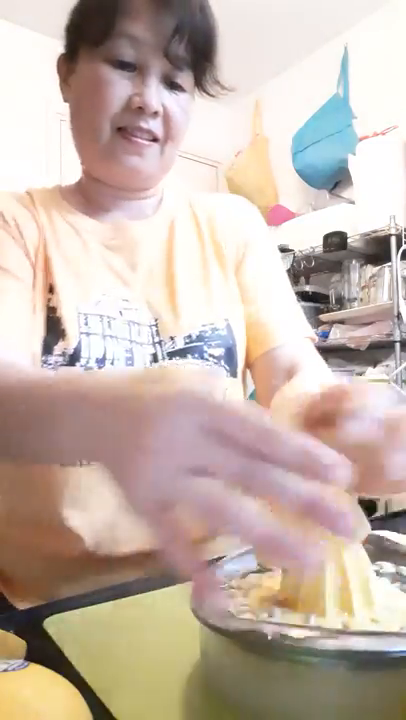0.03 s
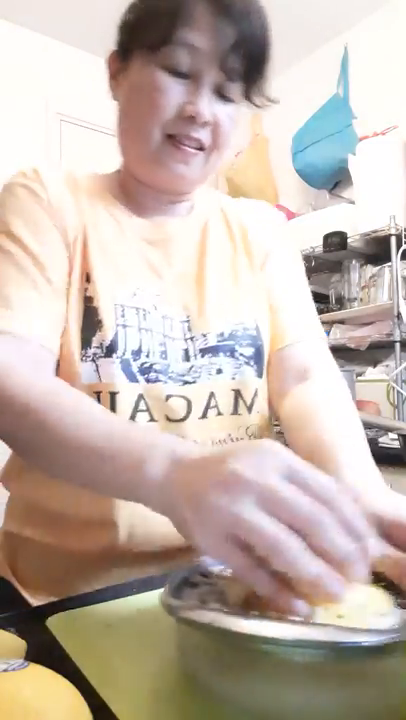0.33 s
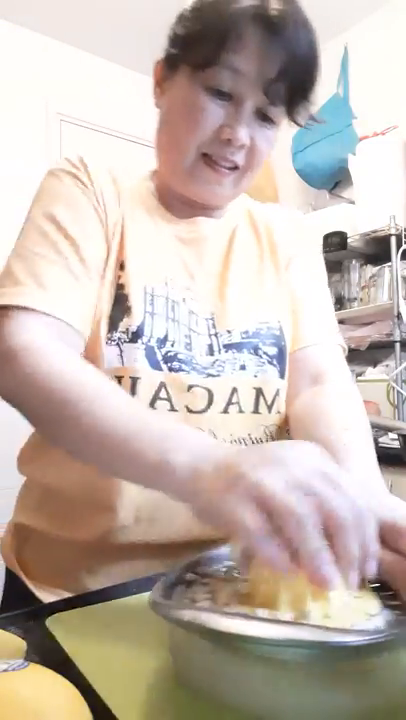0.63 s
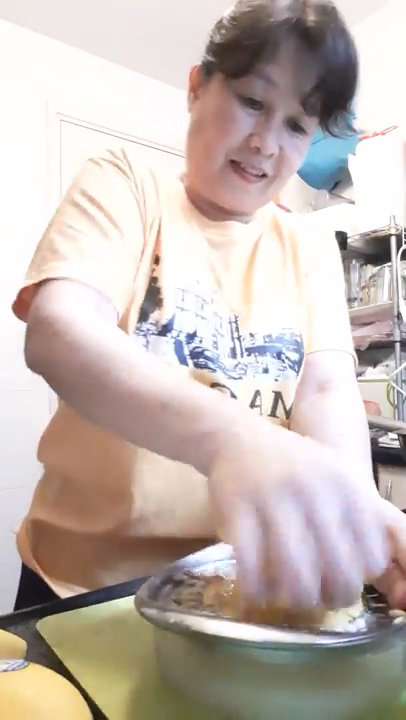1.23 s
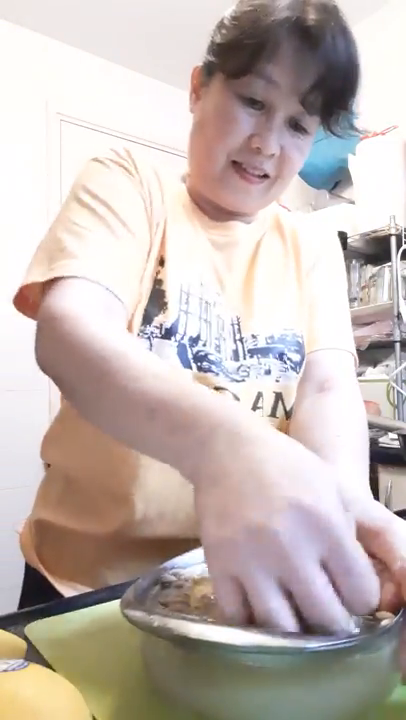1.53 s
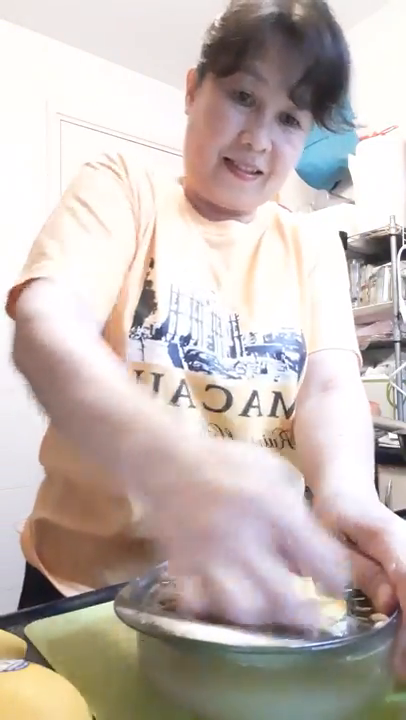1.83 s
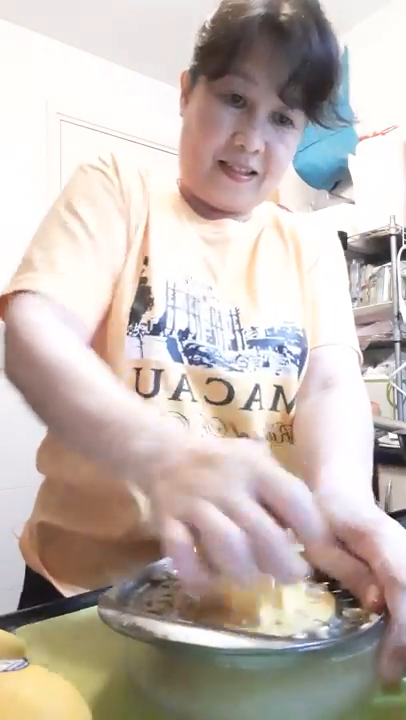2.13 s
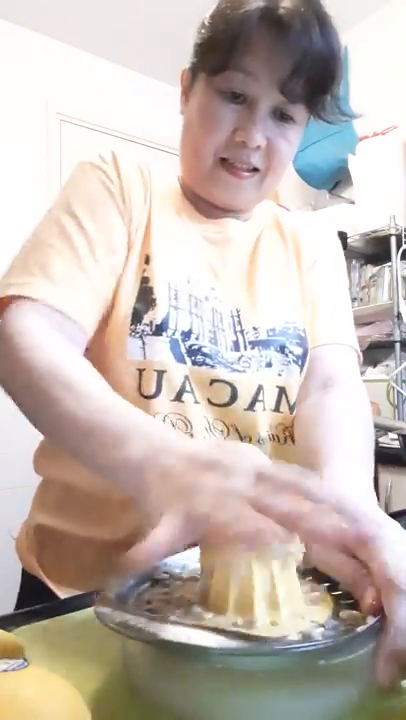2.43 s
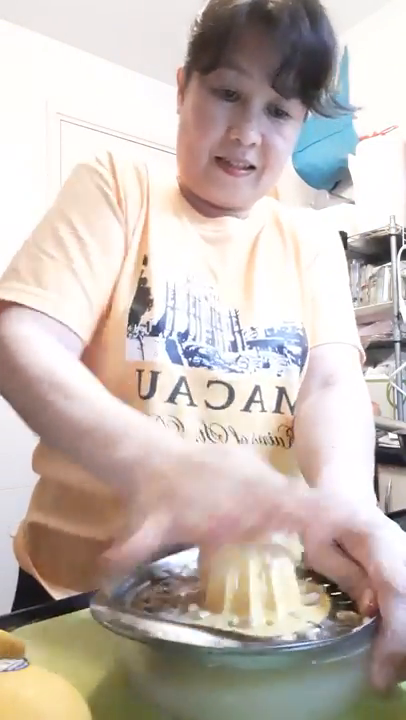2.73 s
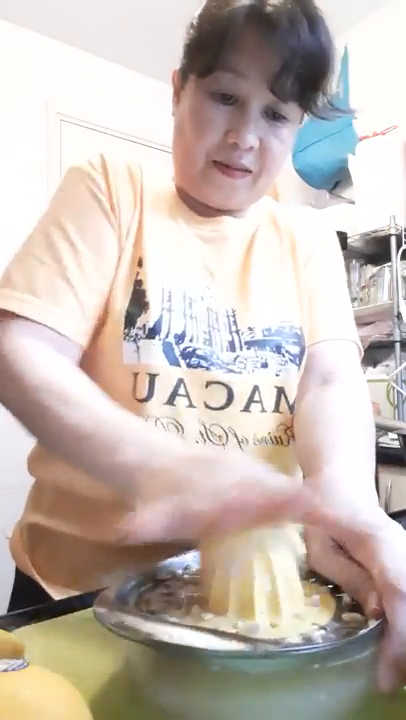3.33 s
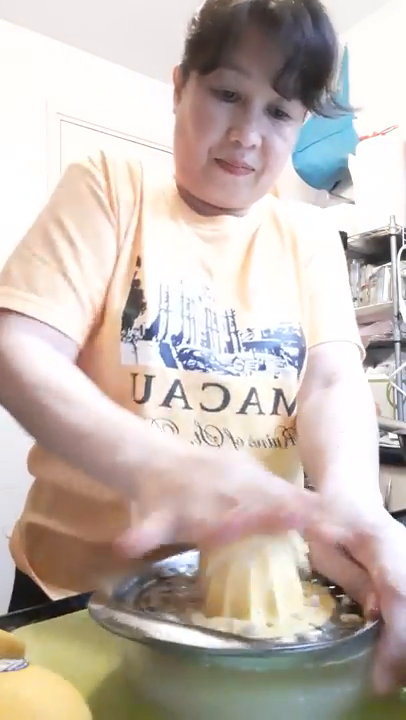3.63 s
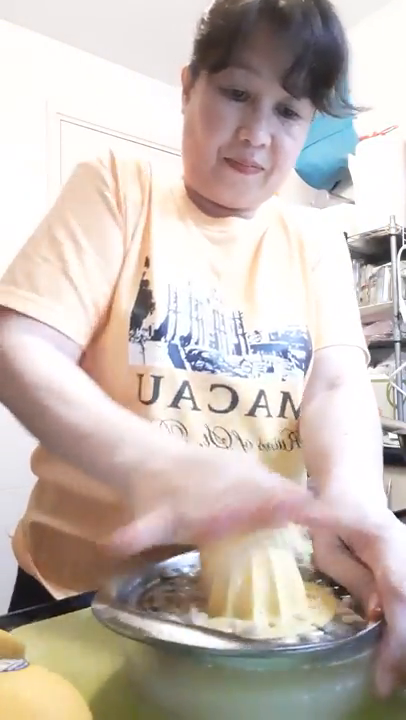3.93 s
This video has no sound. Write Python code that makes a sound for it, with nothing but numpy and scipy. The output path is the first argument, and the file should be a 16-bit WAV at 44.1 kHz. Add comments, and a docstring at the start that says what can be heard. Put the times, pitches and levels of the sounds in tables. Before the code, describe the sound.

A metal juicer knocks and chatters hollowly on a glass bowl as a lemon is twisted on it, starting lightly at 0.2 seconds and continuing unevenly until 4. Brief hollow hoots come near 0.5, 0.8 and 2.3 seconds. Pulp crackles and juice squirts, more strongly after 2.5, with short rasps and sharp ticks. Pushes thump the worktop between 0.8 and 2.8 seconds. Everything is close, over quiet kitchen air.

```python
"""A ridged metal juicer knocks and chatters on a glass bowl as a lemon half is pressed and twisted on it.
Each blow rings the plate, the bowl and the hollow between them, which hoots when the juicer rocks free.
Pulp crackles, juice spits out in squirts, rubbing adds a few short rasps and single cells tick sharply.
The hardest pushes thump the worktop. It is all heard close up in a kitchen, over quiet room air."""
import sys
import numpy as np
from scipy import signal
from scipy.fft import rfft, irfft, next_fast_len
from scipy.io import wavfile
from scipy.ndimage import map_coordinates

SR = 44100
rng = np.random.default_rng(int(sys.argv[2]) if len(sys.argv) > 2 else 0)


def persist_wave(psi):
    """Save psi, clipped to +-1, as 16-bit WAV."""
    counts = np.round(np.clip(psi, -1, 1) * 32767).astype(np.int16)
    wavfile.write(sys.argv[1], SR, np.atleast_2d(counts).T)


N = 176400

# The twisting hand. Each row: time in seconds, chatter level in dB, wet crackle level in dB.
HAND_EFFORT = [(.17, -46.5, -67), (.36, -34, -42), (.79, -24.5, -44), (0.901, -46, -61), (0.958, -27, -43),
               (1.28, -31, -59), (1.429, -24, -40.5), (1.60, -37.5, -58), (1.688, -28.5, -41),
               (2.32, -29, -47), (2.50, -28, -29.5), (2.63, -28.5, -47), (2.99, -26, -37.5),
               (3.14, -32.5, -47.5), (3.198, -27.5, -31.5), (3.45, -30.5, -45.5), (3.59, -28.5, -32.5),
               (4.0, -26.5, -48)]
# Juicer on bowl. Each row: start in seconds, level in dB, hollow's pitch in Hz, relative clack in dB.
RIM_KNOCKS = [(0.204, -28.5, 606, -4), (0.624, -16, 562, -12), (0.745, -17, 596, -18),
              (0.923, -21, 537, -18.5), (0.941, -29, 555, -3), (0.982, -16, 563, -13),
              (1.047, -11, 585, -26), (1.058, -13.5, 695, -20), (1.075, -14.5, 543, -25),
              (1.092, -14.5, 715, -22), (1.165, -15, 542, -13.5), (1.18, -15.5, 539, -18.5),
              (1.247, -21, 555, -20), (1.337, -16, 570, -5.5), (1.368, -15, 524, -16),
              (1.619, -17.5, 527.5, -20.5), (1.756, -13.5, 571, -19), (1.815, -21, 597, -14),
              (1.836, -20.5, 540, -22), (2.019, -8, 525, -17), (2.162, -19.5, 543, -12),
              (2.236, -20.5, 533, -4), (2.343, -11, 543, -19), (2.481, -14, 579, -13),
              (2.621, -17.5, 545, -19), (2.639, -19, 557, -36), (2.73, -18, 521, -13),
              (2.767, -15.5, 583, -15.5), (2.781, -12, 524, -39), (2.912, -16, 540, -9),
              (3.016, -15, 555, -12.5), (3.237, -27.5, 570, -2.5), (3.313, -14.5, 517, -10),
              (3.434, -23, 595, -25), (3.565, -18, 541, -18)]
# Ring of the covered bowl. Each row: pitch in Hz, seconds to fade by 60 dB, level in dB.
BOWL_MODES = [(150, 0.071, -19), (288.4, 0.13, -23.5), (351.7, 0.08, -8.5), (521.5, 0.27, -15),
              (574, 0.06, -13), (734, 0.12, -17), (868, 0.14, -24.5)]
# Clack of the metal plate. Each row: pitch in Hz, seconds to fade by 60 dB, level in dB.
PLATE_MODES = [(945, 0.048, -2), (1487, 0.02, 9), (1608, 0.035, 5.5), (2706, 0.014, 0)]
# Spits of juice and short midrange rubbing rasps (the three rows with the body above 20 dB).
# Each row: start in seconds, swell in seconds, level in dB, relative body in dB, body pitch in Hz.
SQUIRTS_AND_RASPS = [(0.229, 0.0011, -35.5, 7, 1600), (0.434, 0.03, -49, 27.5, 1335),
                     (0.607, 0.016, -31.5, 11, 2940), (0.928, 0.0038, -34.5, 4, 1510),
                     (0.984, 0.013, -32, 2, 3970), (1.162, 0.021, -50, 24, 1600),
                     (1.310, 0.04, -25.5, -1.5, 1710), (1.723, 0.019, -33, 0.5, 1600),
                     (2.231, 0.0033, -30.5, 3, 1880), (2.247, 0.02, -47.5, 27.5, 1400),
                     (2.384, 0.0039, -27.5, 3.5, 4900), (2.534, 0.023, -27.5, 2, 1580),
                     (2.839, 0.012, -37.5, 2, 1800), (2.873, 0.023, -28, 2.5, 1800),
                     (3.027, 0.018, -20.5, -3, 1560), (3.165, 0.01, -29.5, -6, 1700),
                     (3.317, 0.032, -25.5, 4, 1430), (3.533, 0.036, -31, 2, 1670),
                     (3.628, 0.016, -20, -2, 1660), (3.792, 0.03, -23.5, 7, 1760),
                     (3.931, 0.0056, -28, 3.5, 1350)]
# Fleshy midrange of pulp. Each row: frequency in Hz, level in dB.
PULP_EQ = [(300, -10), (700, 7.5), (1150, -6), (1600, -1.5), (2800, -5), (14000, -31)]
# Bright fizz of spray. Each row: frequency in Hz, level in dB.
SPRAY_EQ = [(1500, -41), (4700, -8), (6500, -11), (9300, -3.5), (16000, -8.5)]
# Single cells bursting. Each row: start in seconds, level in dB.
CELL_TICKS = [(0.412, -28), (0.506, -31), (0.778, -24), (0.883, -39.5), (1.094, -33), (1.482, -36),
              (1.869, -17.5), (1.883, -36), (1.985, -30), (2.039, -29.5), (2.249, -27.5), (2.412, -21),
              (2.69, -27), (2.854, -32.5), (3.173, -17), (3.488, -26), (3.789, -11)]
# The hollow singing on. Each row: start in seconds, level in dB, pitch in Hz, decay in seconds.
HOLLOW_HOOTS = [(.469, -7, 513.3, 0.024), (.809, -8, 529, 0.014), (2.262, -11, 507.5, 0.059)]
# Hard pushes into the worktop. Each row: start in seconds, level in dB.
WORKTOP_THUMPS = [(0.777, -20.5), (1.158, -24), (1.371, -22), (1.813, -18.5), (2.47, -13), (2.769, -18)]
# Low rumble of the worktop. Each row: frequency in Hz, level in dB.
RUMBLE_EQ = [(40, -43), (62, -13), (88, 4.5), (105, -6.5), (350, -10), (600, -42)]
# Bass-heavy room air. Each row: frequency in Hz, level in dB.
AIR_EQ = [(25, -78), (90, -7.5), (600, -38.5), (16000, -47)]

HOLLOW_HZ, CONTACT_S = 559.9, 0.0031
RING_TIME = np.arange(SR // 2) / SR  # seconds since an event began


def undb(db):
    """Decibels to gain."""
    return 10 ** (np.asarray(db) / 20)


def unit(x):
    """Scale to rms 1."""
    return x / np.sqrt(np.mean(x ** 2))


def rise(t, attack_s):
    """Smooth attack towards full level."""
    return 1 - np.exp(-t / attack_s)


def add(out, start, x):
    """Mix x into out, from start in seconds."""
    i = max(int(start * SR), 0)
    out[i:i + len(x)] += x[:max(len(out) - i, 0)]


def convolve(x, response):
    """Convolve along time, keeping the length."""
    size = next_fast_len(x.shape[-1] + response.shape[-1])
    return irfft(rfft(x, size) * rfft(response, size), size)[..., :x.shape[-1]]


def colour(x, eq, size=4096):
    """Minimum-phase EQ with unit power gain."""
    hz, db = np.array(eq).T
    log_hz = np.log(np.fft.rfftfreq(size) * SR + 1)
    gain = unit(undb(np.interp(log_hz, np.log(hz), db)))
    cepstrum = irfft(np.log(gain))
    cepstrum[1:size // 2] *= 2
    cepstrum[size // 2 + 1:] = 0
    return convolve(x, irfft(np.exp(rfft(cepstrum))))


def clicks(per_s, spread_db):
    """Random clicks of uneven size, scattered across the stereo field; rms 1."""
    size = undb(spread_db * np.minimum(rng.exponential(size=N), 4))
    sides = rng.choice([-1, 1], N) + rng.standard_normal((2, N))
    return unit((rng.random(N) < per_s / SR) * size * sides)


def twisting_hand():
    """The hand rides two gain curves: chatter and wet crackle."""
    times, *levels = np.array(HAND_EFFORT).T
    return [undb(np.interp(np.arange(N) / SR, times, db)) for db in levels]


def struck_modes(modes, t, scatter):
    """Ringing modes; the grip shifts their pitch and strength a little at every blow."""
    hz, t60, db = np.array(modes).T[:, :, None]
    detune, strength = rng.standard_normal((2, len(modes), 1))
    envelopes = undb(db + 3.5 * strength) * np.exp(-np.log(1000) * t / t60)
    waves = np.sin(2 * np.pi * hz * (1 + scatter * detune) * t)
    return np.sum(envelopes * waves, axis=0) * rise(t, CONTACT_S)


def knock(hz, clack_db, swell_s=0.0042, scuff_s=0.016):
    """One blow: the hollow under the juicer swells and dies, bowl and plate ring, the rim scuffs."""
    t = np.arange(SR // 5) / SR
    hollow = t / swell_s * np.exp(1 - t / swell_s) * np.sin(2 * np.pi * hz * t)
    grip = np.sqrt(hz / HOLLOW_HZ)  # the push that raises the hollow's pitch also raises the bowl's
    scuff = colour(rng.standard_normal(len(t)) * np.exp(-t / scuff_s), PULP_EQ)
    bowl = struck_modes(BOWL_MODES, t * grip, scatter=0.014)
    plate = struck_modes(PLATE_MODES, t, scatter=0.045)
    return hollow + undb(3) * bowl + undb(clack_db + 8) * (plate / 2 + undb(-13) * scuff)


def juicer_rattle(chatter_per_s=55, pitch_scatter=0.0832):
    """Loud knocks, with uneven chatter between them as the peel slips over the ridges."""
    out = np.zeros(N)
    for start, db, hz, clack_db in RIM_KNOCKS:
        add(out, start, undb(db - 1.5) * knock(hz, clack_db))
    force, _ = twisting_hand()
    start = 0
    while start < (N - 1) / SR:
        size, pitch, gap = rng.standard_normal(3)
        gain = force[int(start * SR)] * undb(3 * min(size, 1.5) - 0.5)
        add(out, start, gain * knock(HOLLOW_HZ * np.exp(pitch_scatter * pitch), clack_db=-16.5))
        start += np.exp(0.4 * gap) / chatter_per_s
    return out


def juice_and_rasps(drops_per_s=7000, release_s=0.006):
    """Cells crackle; a squirt is spray over a body of tearing pulp, a rubbing rasp nearly all body."""
    bodies, spray_gain, t = np.zeros((2, N)), np.zeros(N), RING_TIME
    grit = colour(clicks(drops_per_s / 2, spread_db=-1), PULP_EQ)
    for start, swell_s, db, body_db, hz in SQUIRTS_AND_RASPS:
        swell = np.interp(t, [0, swell_s], [0.33, 1])
        envelope = swell * np.exp(-np.maximum(t - swell_s, 0) / release_s)
        add(spray_gain, start, undb(db + 6.5) * envelope)
        grains = np.roll(grit, -int(start * SR), axis=1)[:, :len(t)]
        resonance = signal.iirpeak(hz, Q=2, fs=SR)  # in a squirt, a wet pocket ringing
        ringing = unit(signal.lfilter(*resonance, signal.lfilter(*resonance, grains)))
        for side, body in zip(bodies, unit(undb(-9) * grains + ringing)):
            add(side, start, undb(db + body_db - 3) * envelope * body)
    _, wetness = twisting_hand()
    spray = spray_gain * clicks(drops_per_s, spread_db=-1)
    crackle = undb(-3) * wetness * clicks(per_s=1700, spread_db=3.6)
    grind = undb(-2.5) * wetness * grit
    return bodies + colour(spray + crackle, SPRAY_EQ) + grind


def wet_gaps(x, depth_db=3.6, step_s=0.013, step_hz=800):
    """Wet gaps under the peel open and close, so the colour of the splutter keeps shifting."""
    hz, t, spectra = signal.stft(x, SR, nperseg=256)
    grid = np.meshgrid(hz / step_hz, t / step_s, indexing="ij")
    fields = rng.standard_normal((3, 128, 512))
    shared, left, right = (map_coordinates(field, grid, mode="mirror") for field in fields)
    gain = undb(depth_db * (shared + np.array([left, right])))
    return signal.istft(spectra * unit(gain), SR)[1][:, :N]


def bursting_cells(centre_hz=11500, decay_s=0.0013):
    """Each bursting cell snaps for a few milliseconds at its own high pitch."""
    out, t = np.zeros((2, N)), RING_TIME
    for start, db in CELL_TICKS:
        hz = min(centre_hz * np.exp(0.15 * rng.standard_normal()), 15800)
        resonance = signal.iirpeak(hz, Q=2.5, fs=SR)
        for side in out:
            snap = unit(signal.lfilter(*resonance, rng.standard_normal(len(t))))
            add(side, start, undb(db + 5) * np.exp(-t / decay_s) * snap)
    return out


def hollow_hoots(rock_hz=34, damp_s=0.06):
    """The freed juicer lets the hollow sing a round tone, throbbing as it rocks until the hand damps it."""
    out, t = np.zeros(N), RING_TIME
    throb = 1 + 0.3 * np.sin(2 * np.pi * rock_hz * t)
    damping = 1 / (1 + (t / damp_s) ** 8)
    for start, db, hz, decay_s in HOLLOW_HOOTS:
        envelope = rise(t, CONTACT_S) * np.exp(-t / decay_s) * throb * damping
        add(out, start, undb(db) * envelope * np.sin(2 * np.pi * hz * t))
    return out


def worktop(boom_hz=89.1, decay_s=0.063):
    """The worktop booms under each hard push and rumbles with the chatter."""
    out, t = np.zeros(N), RING_TIME
    envelope = rise(t, attack_s=0.0042) * np.exp(-t / decay_s)
    boom = envelope / envelope.max() * np.sin(2 * np.pi * boom_hz * t)
    for start, db in WORKTOP_THUMPS:
        add(out, start, undb(db - 7.5) * boom)
    force, _ = twisting_hand()
    rumble = colour(force * rng.standard_normal(N), RUMBLE_EQ)
    return out + undb(-13) * rumble


def kitchen(x, t60_s=0.15, wide_hz=1120):
    """Hard walls add a short tail, wider in the treble than in the bass."""
    t = RING_TIME
    hz = np.fft.rfftfreq(len(t)) * SR
    treble = hz ** 2 / (hz ** 2 + wide_hz ** 2)
    tail = np.exp(-np.log(1000) * t / t60_s) * rise(t, attack_s=0.002)
    mid, side = rfft(rng.standard_normal((2, len(t))) * tail / np.linalg.norm(tail))
    side *= (1 + treble) / 2
    response = irfft(np.array([mid + side, mid - side])) / np.sqrt(2)
    return x + undb(-3.5) * convolve(x, response)


def scene():
    """Juicer, juice, rasps and worktop in the kitchen, over quiet room air."""
    air = undb(-53) * colour(rng.standard_normal((2, N)), AIR_EQ)
    close = juicer_rattle() + wet_gaps(juice_and_rasps()) + bursting_cells() + hollow_hoots() + worktop()
    return kitchen(close) + air


def record(dry):
    """The left mic port is farther off and late; its treble resonance pulls the fizz left. The top is cut."""
    port_hz, width_hz, lag_s, top_hz = 9100, 950, 1.4 / SR, 15800
    hz = np.fft.rfftfreq(N) * SR
    balance_db = -4.5 + 13.5 / (1 + ((hz - port_hz) / width_hz) ** 2)
    left = undb(balance_db / 2) * np.exp(-2j * np.pi * hz * lag_s)
    right = undb(-balance_db / 2)
    high_cut = signal.ellip(10, 0.2, 70, top_hz, fs=SR, output="sos")
    return signal.sosfilt(high_cut, irfft(rfft(dry) * np.array([left, right])))


dry = scene()
out = record(dry)
persist_wave(out)
```